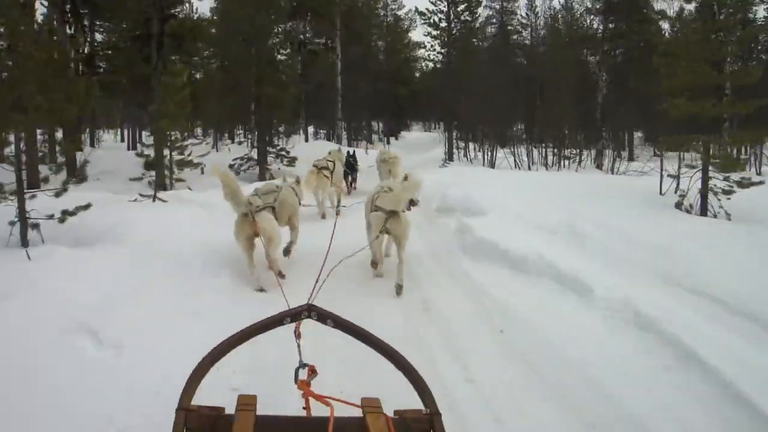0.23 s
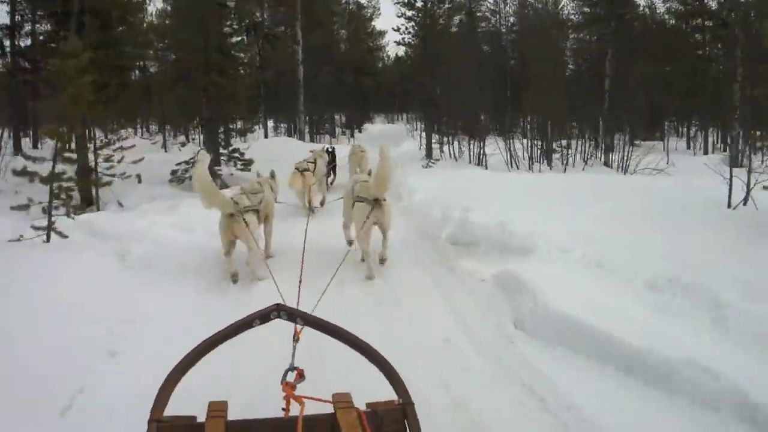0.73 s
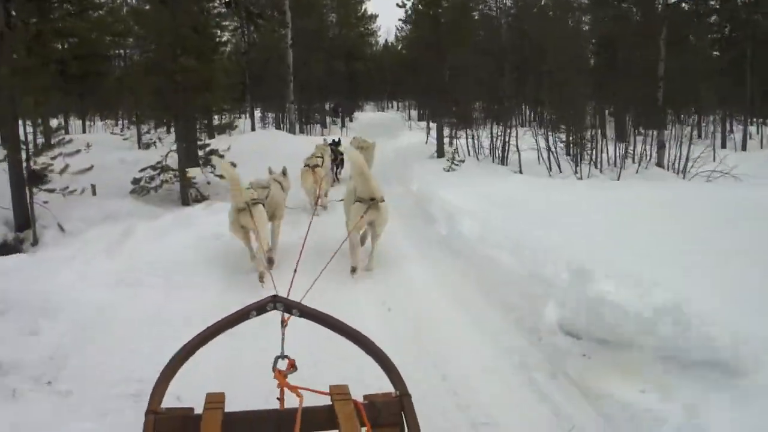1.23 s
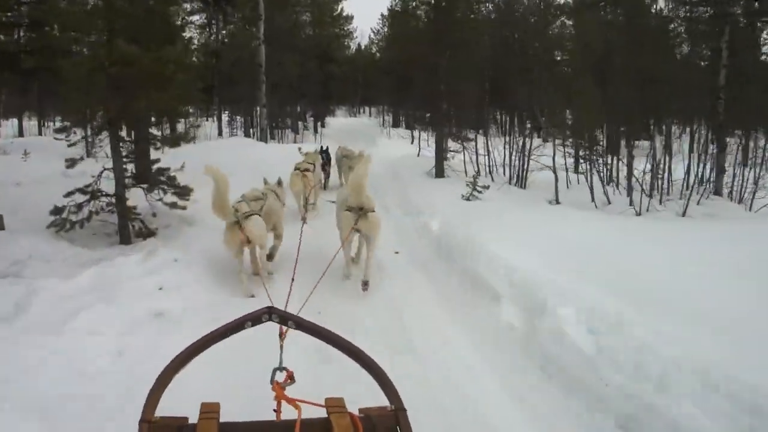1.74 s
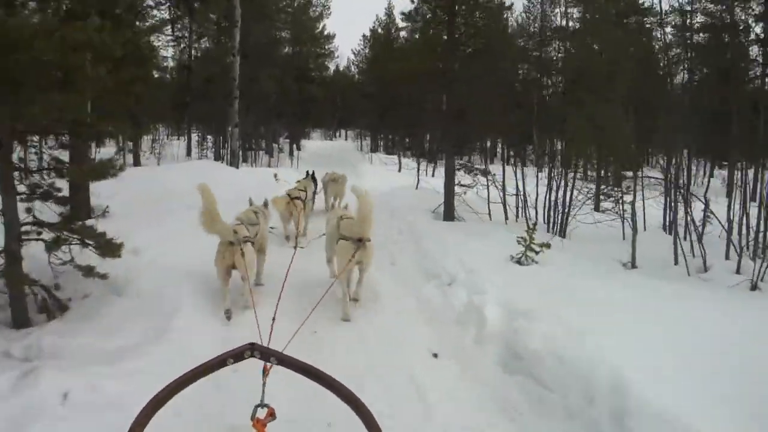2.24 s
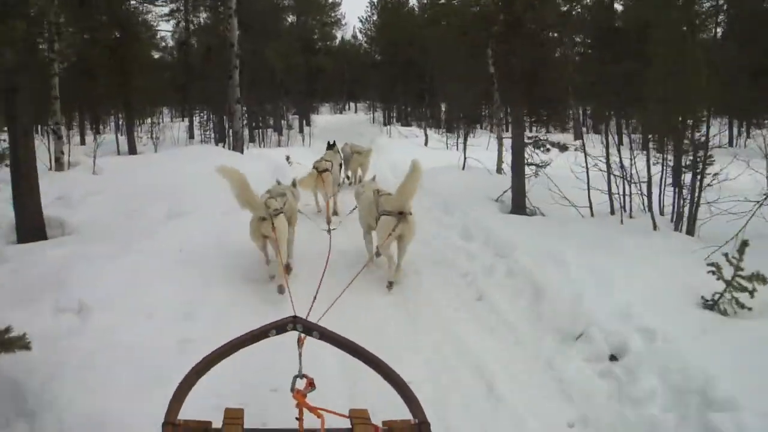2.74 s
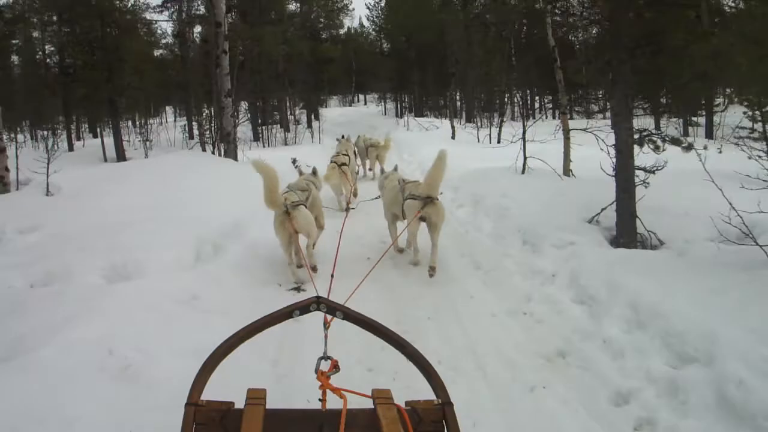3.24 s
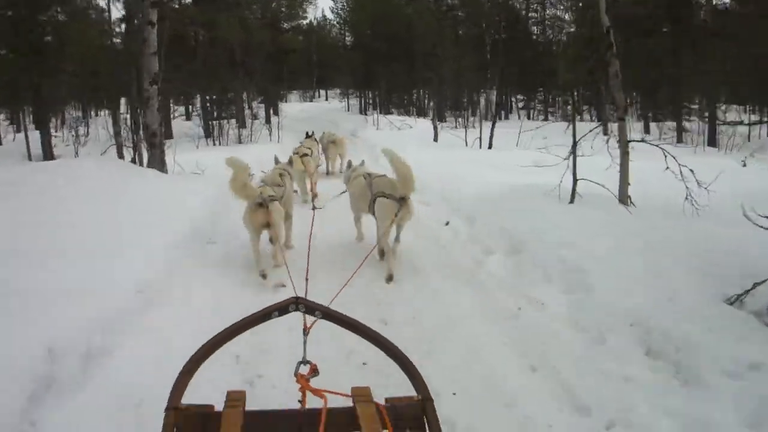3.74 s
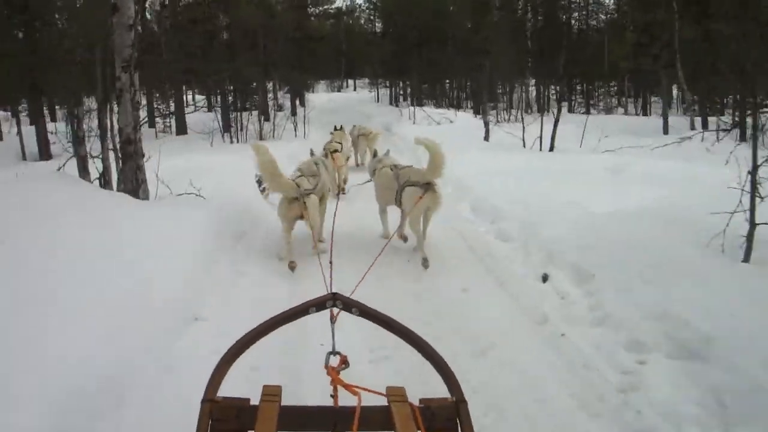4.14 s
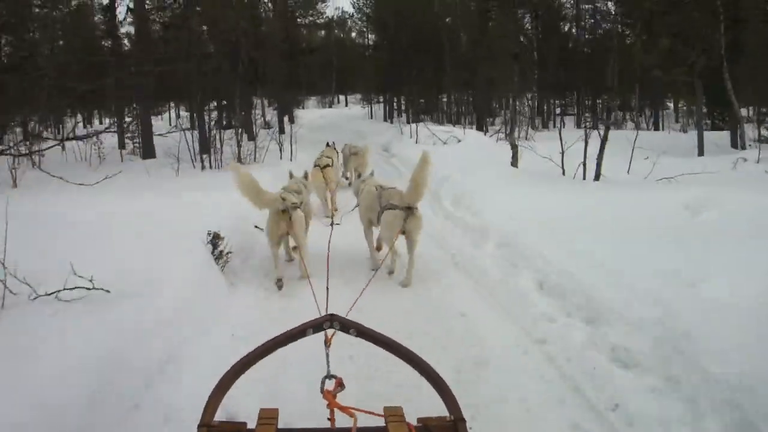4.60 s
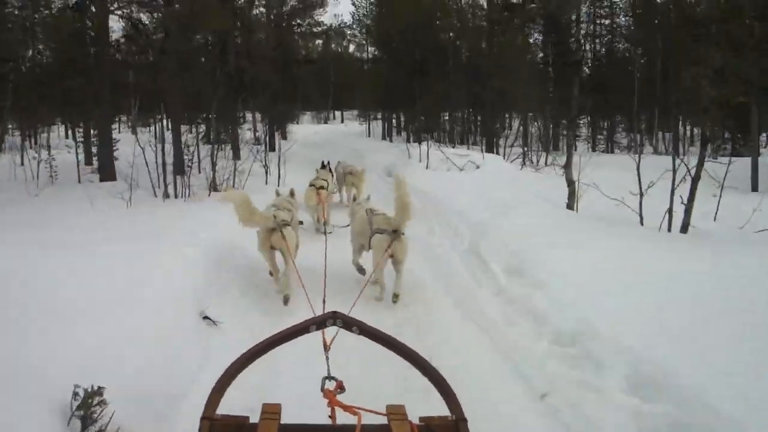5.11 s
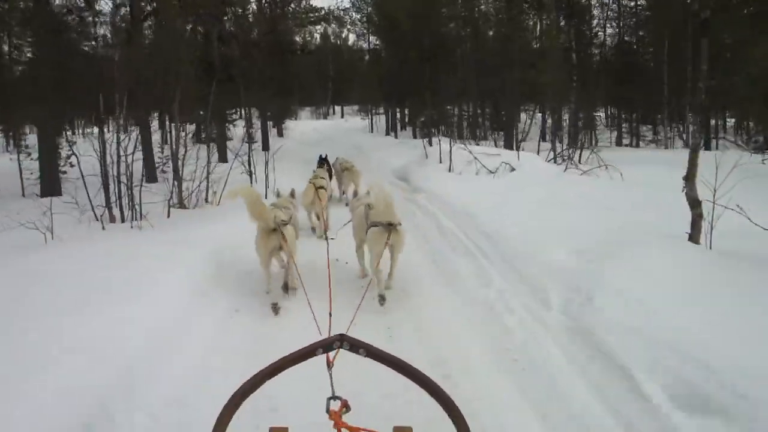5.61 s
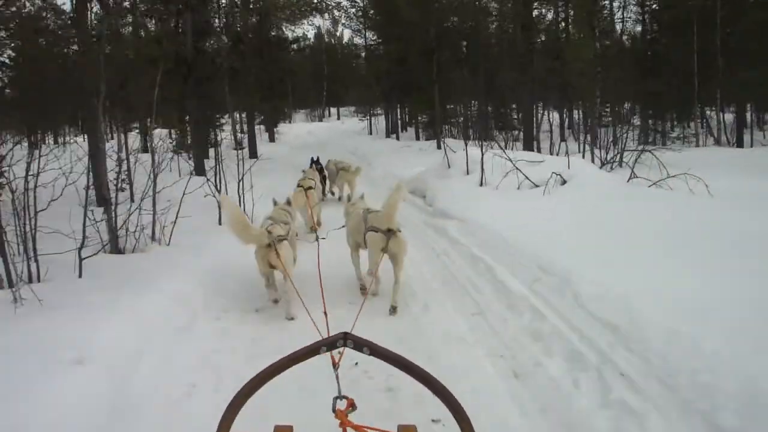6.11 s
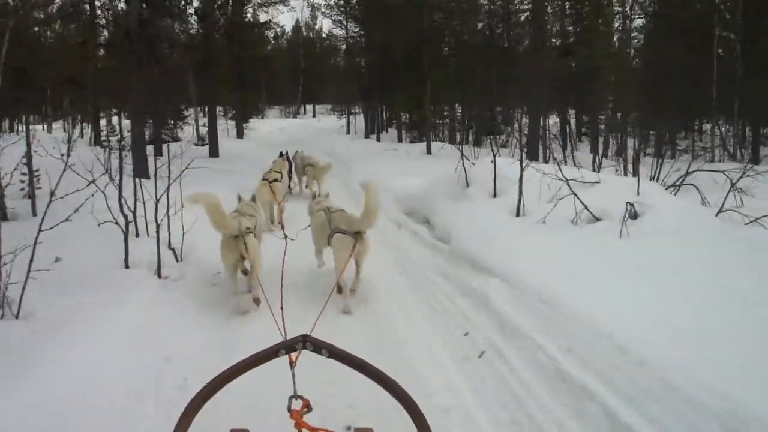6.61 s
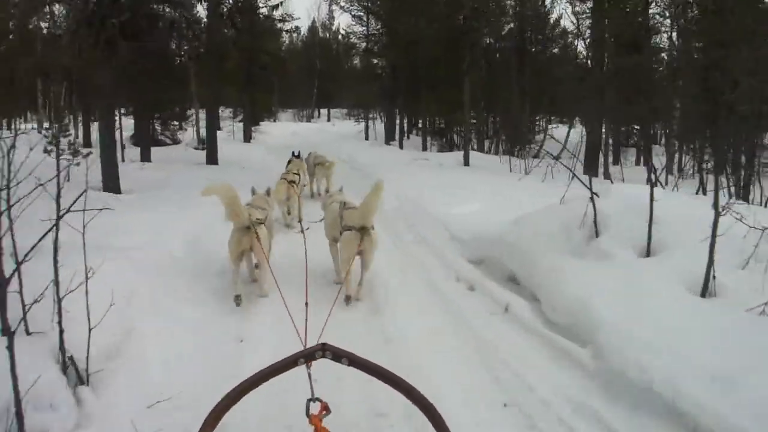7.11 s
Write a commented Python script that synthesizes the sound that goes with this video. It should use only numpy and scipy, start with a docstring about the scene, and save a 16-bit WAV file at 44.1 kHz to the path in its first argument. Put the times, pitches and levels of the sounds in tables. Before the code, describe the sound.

On board a gliding sled: rough, uneven snow scraping with crystalline hiss, low wooden rumble, sharp crust cracks and occasional clip ticks.

```python
"""A wooden dog sled glides over packed snow, heard from on board.
From start to end the runners crush snow grains: a scrape that swells with the load and rings in the
runner, with a hiss of fine crystals, over the rumble of the frame and a deep murmur as the sled bends.
Soon the frame thumps over the first lump and metal clips clink; then the crust begins to snap.
Thumps, clinks and snaps, each a short burst that dies away, come back at uneven times."""
import sys
import numpy as np
from scipy import signal
from scipy.io import wavfile
from scipy.ndimage import uniform_filter1d

SR = 44100
rng = np.random.default_rng(int(sys.argv[2]) if len(sys.argv) > 2 else 0)


def waveform_to_disk(signal):
    """Save audio, clipped to [-1, 1], as 16-bit WAV at the path in sys.argv[1]."""
    frames = np.transpose(np.atleast_2d(signal))
    scaled = np.clip(frames, -1, 1) * 32767
    samples = np.round(scaled).astype(np.int16)
    wavfile.write(sys.argv[1], SR, samples)


N = 324135  # length of the scene [samples]

# how hard the runners press into the snow:
# (time [s], load level [dB], level of the crystal hiss over the load level [dB])
RUNNER_LOAD = [(0.0, -23.5, -7), (0.04, -27, -4), (0.1, -26, -8), (0.22, -34, -10), (0.31, -34.5, -8),
               (0.49, -26, -7.5), (0.51, -30, -6), (0.55, -25.5, -7.5), (0.78, -26.5, -8.5),
               (1.08, -32.5, -8.5), (1.45, -31.5, -3.5), (1.53, -29.5, -7), (1.78, -35.5, -8.5),
               (1.86, -36, -6), (2.19, -27.5, -7.5), (2.37, -29.5, -5), (2.6, -29, -9.5), (2.74, -34, -6),
               (2.83, -31, -12), (2.84, -27.5, -14), (2.97, -24, -6.5), (3.19, -24.5, -9), (3.23, -28, -6),
               (3.44, -33, -11), (3.52, -27, -6.5), (3.83, -23.5, -7), (4.03, -33.5, -6.5),
               (4.15, -30, -7.5), (4.24, -25, -6.5), (4.52, -28.5, -6), (4.56, -24, -6.5),
               (4.87, -28.5, -4.5), (4.95, -26.5, -6.5), (5.2, -33.5, -11.5), (5.36, -32.5, -9.5),
               (5.42, -23.5, -15), (5.49, -28, -7.5), (5.77, -24.5, -9), (5.81, -29.5, -7.5),
               (6.14, -28.5, -8), (6.26, -30.5, -3.5), (6.3, -27.5, -6.5), (6.37, -32, -3),
               (6.47, -24.5, -7), (6.61, -30, -3), (6.63, -29, -6), (6.96, -28.5, -5), (7.0, -25, -6.5),
               (7.27, -27.5, -6), (7.35, -25, -7)]
MIDDLE_LOAD_DB = -26


def gain_of(db):
    """Turns decibels into a factor for the sound wave."""
    return 10 ** (np.asarray(db) / 20)


def evened(x):
    """Scales a sound to an average strength (rms) of 1."""
    return x / np.sqrt(np.mean(x ** 2) + 1e-20)


def add(mix, start_s, sound):
    """Adds a short sound to the mix, cut off where the mix ends."""
    part = mix[round(start_s * SR):][:len(sound)]
    part += sound[:len(part)]


def control(rows):
    """Draws straight lines between the rows: one smooth curve for each column after the time."""
    times, *columns = np.transpose(rows)
    return [np.interp(np.arange(N) / SR, times, column) for column in columns]


def load_over_middle():
    """Load on the runners above or below its middle value [dB]."""
    return control(RUNNER_LOAD)[0] - MIDDLE_LOAD_DB


def colour(x, points):
    """Filters to the given spectrum without looking ahead, so that each grain rings after it breaks."""
    hz = abs(np.fft.fftfreq(8192, 1 / SR))
    point_hz, point_db = np.transpose(points)
    log_gain = np.log(gain_of(np.interp(np.log(hz + 1), np.log(point_hz), point_db)))
    # the phase that belongs to this gain puts the response as early as it can be
    taps = np.fft.ifft(np.exp(np.conj(signal.hilbert(log_gain)))).real[:4096]
    return signal.oaconvolve(x, taps / np.linalg.norm(taps))[:len(x)]


def resonate(x, hz, width):
    """Resonance of gain 1 on a moving pitch: shifts the pitch down to zero, smooths, shifts back."""
    turn = np.exp(2j * np.pi * np.cumsum(hz) / SR)
    decay = np.exp(-np.pi * width / SR)  # width in Hz
    return 2 * (turn * signal.lfilter([1 - decay], [1, -decay], x / turn)).real


def wander(slowest_hz, fastest_hz):
    """Smooth random curve of rms 1: 60 slow waves between two rates, the slower ones stronger."""
    t = np.arange(N // 64 + 2) * 64 / SR
    waves = 0
    for hz in np.geomspace(slowest_hz, fastest_hz, 60):
        waves = waves + np.sin(2 * np.pi * (hz * t + rng.random())) / hz ** 0.57
    return np.interp(np.arange(N) / SR, t, evened(waves))


def grains(per_s, spread_db, smooth):
    """Breaking grains of random size and sign, mixed with a smooth share of sliding noise."""
    size = gain_of(spread_db * np.minimum(rng.exponential(1, N), 5))
    sign = rng.choice([-1., 1.], N)
    breaks_now = rng.random(N) < per_s / SR
    clicks = evened(size * sign * breaks_now)
    return np.sqrt(1 - smooth) * clicks + np.sqrt(smooth) * rng.standard_normal(N)


def patchy(x, patchy_db):
    """Uneven snow: areas of pitch some hundred Hz wide swell and fade for some tens of ms."""
    spectrum = signal.stft(x, nperseg=256, noverlap=192)[2]
    patches = rng.standard_normal(spectrum.shape[::-1])  # (time, pitch)
    patches = uniform_filter1d(patches, size=24, axis=0)
    patches = evened(uniform_filter1d(patches, size=3, axis=1))
    uneven = spectrum * gain_of(patchy_db * patches).T
    return evened(signal.istft(uneven, nperseg=256, noverlap=192)[1][:N])


def flexing():
    """The whole sled bends over bumps: a lumpy deep murmur with gaps."""
    # spectrum of the murmur: (pitch [Hz], level [dB per Hz])
    deep_spectrum = [(15, -10), (40, -8), (75, -6), (110, -24), (200, -21.5)]
    level_db = -56 + 0.4 * load_over_middle() + 4.5 * wander(2.5, 9)
    return gain_of(level_db) * colour(rng.standard_normal(N), deep_spectrum)


def frame():
    """The wood shakes with small lumps all along and is jolted by the large ones."""
    # spectrum of the shaking wood: (pitch [Hz], level [dB per Hz])
    rumble_spectrum = [(15, -24), (30, -17), (75, -35), (125, -8.5), (185, 0), (265, -1), (360, -6.5),
                       (600, -7), (1200, -61)]
    # the frame lands on a lump: (middle of the blow [s], peak level [dB], pitch [Hz], length [cycles])
    thumps = [(0.283, -27, 167, 1.7), (0.68, -23, 208, 2.5), (.738, -26, 251, 3.6), (0.785, -20, 260, 3.2),
              (0.841, -24, 220, 2.8), (0.862, -20.5, 230, 2.2), (0.891, -28, 197, 3.7),
              (1.11, -32, 199, 3.3), (1.286, -24, 188, 1.9), (1.391, -36, 80, 1.4),
              (1.531, -24.5, 232, 1.5), (1.657, -30, 198, 2.4), (2.881, -19, 189, 1.1),
              (3.228, -21, 194, 1.5), (3.245, -34, 80, 1.1), (3.821, -19.5, 240, 1.2),
              (3.964, -23, 218, 1.1), (4.323, -28, 80, 1.7), (4.547, -22, 210, 1.4), (5.113, -27, 166, 1.7),
              (5.25, -34, 90, 0.98), (5.287, -30.5, 70, 1.1), (5.295, -18, 231, 1.1), (5.436, -24, 90, 1.2),
              (5.443, -16, 240, 1.9), (5.576, -13, 290, 1.04), (5.866, -25, 109, 0.49),
              (6.222, -32, 210, 1.9), (6.31, -34, 220, 0.87), (6.545, -32, 222, 3.3),
              (7.092, -24, 220, 1.6), (7.143, -23, 231, 3.1)]
    shake_db, swell = -35.5, 0.47  # level at middle load; dB of rumble per dB of load
    shake = grains(90, spread_db=3.5, smooth=0.68) * gain_of(1.8 * wander(5.9, 25))
    out = colour(evened(shake), rumble_spectrum) * gain_of(shake_db + swell * load_over_middle())
    t = np.arange(-2048, 2048) / SR  # zero at the middle of the blow
    for middle_s, db, hz, cycles in thumps:
        swell_and_fade = np.exp(-(2 * hz * t / cycles) ** 2)  # snow damps the blow almost at once
        blow = swell_and_fade * np.sin(-2 * np.pi * hz * t)
        add(out, middle_s + t[0], gain_of(db) * blow / abs(blow).max())
    return out


def clips():
    """Metal clips knock on the lines: a wide tick, and one small metal tone that dies away."""
    # (time [s], starting level of the tone [dB], pitch [Hz], time to fall by 60 dB [s])
    clinks = [(.3317, -13.5, 9400, 0.0067), (.3355, -20, 10600, .015), (1.189, -27, 8700, .06),
              (1.26, -30, 8850, .09), (1.262, -38, 6500, .1), (1.4337, -22, 10400, 0.033),
              (1.5086, -26, 6050, 0.059), (1.8468, -21, 10300, 0.0083), (1.9, -38, 6500, 0.088),
              (1.9261, -24.5, 6050, 0.05), (3.9166, -23, 8400, .04), (4.3045, -16, 5100, 0.012),
              (4.306, -21, 10600, .015)]
    out, t = np.zeros(N), np.arange(4096) / SR
    for start_s, db, hz, t60 in clinks:
        bright_noise = np.diff(rng.standard_normal(len(t) + 1))
        tick = 0.38 * np.exp(-t / 0.00063) * bright_noise
        tone = np.sin(2 * np.pi * hz * t)
        add(out, start_s, gain_of(db - 60 * t / t60) * (tick + tone))
    return out


def crust():
    """Each snap is a burst of crumbs with a pitch set by the size of the piece, over a wide crack."""
    # crust snaps or crunches under a runner:
    # (time [s], peak level [dB], centre pitch [Hz], time for the crumbs to fall by 60 dB [s])
    snaps = [(0.665, -6.5, 1140, 0.034), (.84, -12, 1650, .08), (1.129, -9.5, 1420, 0.018),
             (1.186, -13, 1140, 0.023), (1.303, -16.5, 890, 0.037), (1.335, -18.5, 1090, 0.07),
             (1.507, -15.5, 1470, 0.089), (1.651, -12.5, 832, .03), (1.761, -17, 961, 0.033),
             (1.978, -19.5, 1500, .08), (2.087, -16, 1640, .08), (2.112, -13, 1700, 0.066),
             (2.185, -10, 1690, .06), (2.212, -9, 1850, 0.086), (2.842, -12, 1880, 0.024),
             (2.856, -25, 1590, .02), (2.88, -10, 1420, 0.016), (3.011, -24, 1750, .08),
             (3.049, -7, 1730, .03), (3.076, -13, 1700, .03), (3.526, -8.5, 1600, 0.03),
             (4.251, -10, 1670, 0.035), (4.561, -11, 1580, 0.069), (4.667, -10, 1660, 0.039),
             (4.776, -9, 1700, 0.11), (5.204, -14.5, 875, .03), (6.128, -8, 1540, 0.026),
             (6.299, -15.5, 1720, .05), (6.868, -16, 1640, .03)]
    # spectrum of the wide crack: (pitch [Hz], level [dB per Hz])
    crack_spectrum = [(300, -30), (900, 0.5), (2500, -7.5), (4500, -16), (6500, -32), (11000, -38)]
    out, t = np.zeros(N), np.arange(4096) / SR
    for start_s, db, hz, t60 in snaps:
        crumbs = rng.standard_normal(len(t)) * gain_of(-60 * t / t60)
        crack = evened(colour(crumbs, crack_spectrum))
        pitched = evened(resonate(crumbs, np.full(len(t), hz), width=480))
        snap = crack + 1.1 * pitched
        add(out, start_s, gain_of(db) * snap / abs(snap).max())
    return out


def runner_ring(drive, scrape_db):
    """The grains make the runner ring; more load makes the ring higher and stronger."""
    # the snow changes along the trail:
    # (time [s], ring over scrape at middle load [dB], ring pitch at middle load [Hz])
    snow = [(0, -9, 1560), (.3, -6, 1590), (.6, -9.5, 1600), (.85, -0.5, 1670), (.98, -1, 1630),
            (1.1, -15, 1590), (1.5, -7, 1560), (2.1, -8, 1630), (2.4, -14, 1650), (2.8, -10, 1570),
            (3.0, -7.5, 1700), (3.2, -6.5, 1654), (3.5, -18.5, 1720), (4.1, -7, 1620), (4.6, -19, 1680),
            (4.8, -1, 1700), (5.2, -18, 1620), (5.9, -8.5, 1620), (6.3, -10.5, 1620), (7.35, -8, 1660)]
    hz_per_db, waver_hz = 9, 30  # rise in pitch per dB of load; random waver of the pitch
    swell, flicker_db = 1, 2.5  # extra dB of ring per dB of load; random flicker of the level
    ring_db, ring_hz = control(snow)
    load_db = load_over_middle()
    ring_hz = ring_hz + hz_per_db * load_db + waver_hz * wander(3, 20)
    # two resonances in a row: narrow (clear tone) and wide (blurred tone), widths in Hz
    clean = evened(resonate(resonate(drive, ring_hz, 170), ring_hz, 170))
    wide = evened(resonate(resonate(drive, ring_hz, 520), ring_hz, 520))
    soft = np.clip(0.05 - 0.04 * ring_db, 0, 1)  # the weaker the ring, the more blurred
    level_db = scrape_db + ring_db + swell * load_db + flicker_db * wander(4, 25)
    return ((1 - soft) * clean + soft * wide) * gain_of(level_db)


def runners():
    """Scrape, ring and hiss share the chatter of the runner over uneven snow."""
    # spectra of the scrape and of the crystal hiss: (pitch [Hz], level [dB per Hz])
    scrape_spectrum = [(200, -20), (400, -14), (660, -9.5), (920, -4), (1300, -3.5), (1650, -3),
                       (1960, -3.5), (2600, -5), (3100, -9.5), (4500, -13), (6300, -27), (9000, -21.5)]
    hiss_spectrum = [(3000, -55.5), (5000, -1), (6500, -1.5), (8000, -2), (10000, 4), (10500, 6),
                     (11000, -6)]
    level_db, hiss_db = control(RUNNER_LOAD)
    scrape_db = level_db + 3.5
    chatter = wander(11, 80)
    drive = grains(2000, spread_db=2.0, smooth=0.76)
    drive = drive * gain_of(0.58 * chatter + 0.5 * wander(14, 60))
    ring = runner_ring(drive, scrape_db)
    scrape = colour(patchy(drive, patchy_db=1.4), scrape_spectrum) * gain_of(scrape_db)
    crystals = grains(4300, spread_db=0.0, smooth=0.99)
    crystals = crystals * gain_of(0.38 * chatter + 0.93 * wander(13, 66))
    hiss = colour(patchy(crystals, patchy_db=1.5), hiss_spectrum) * gain_of(level_db + hiss_db)
    return scrape + ring + hiss


def scene():
    """All the sounds of the sled together, as one channel."""
    return (flexing() + frame() + clips() + crust() + runners())[None]


def record(dry):
    """A small microphone: the deep bass rolls off below 70 Hz, and the treble stops near 11 kHz."""
    thin = signal.sosfilt(signal.butter(2, 70, "highpass", fs=SR, output="sos"), dry)
    treble_limit = signal.firwin(1601, 11010, window=("kaiser", 8), fs=SR)
    return signal.oaconvolve(thin, treble_limit[None], "same")


dry = scene()
out = record(dry)
waveform_to_disk(out)
```